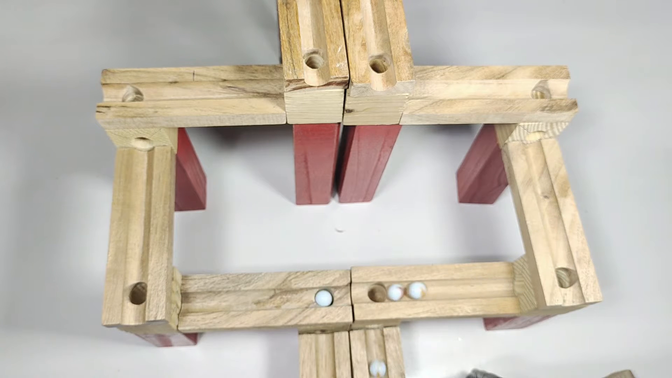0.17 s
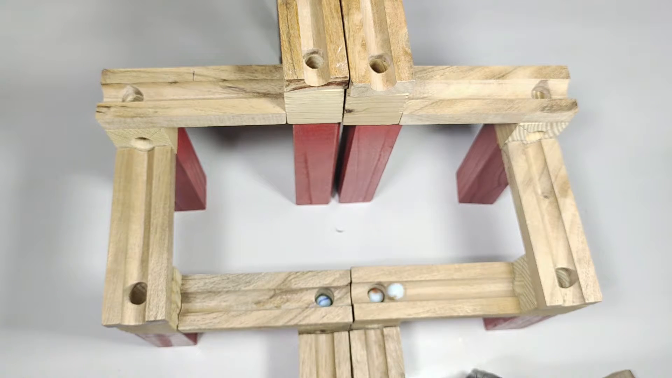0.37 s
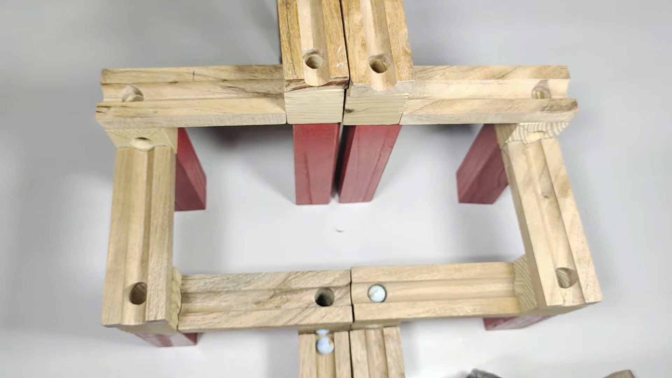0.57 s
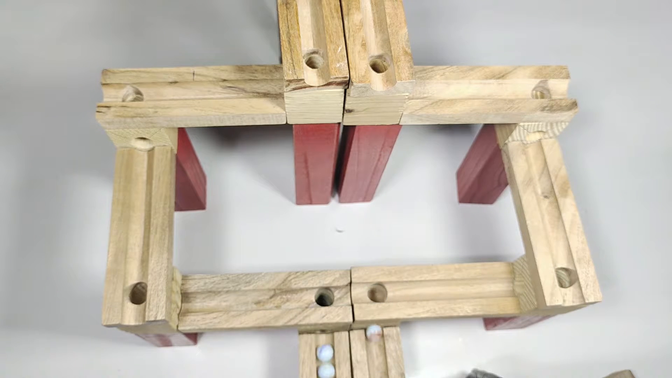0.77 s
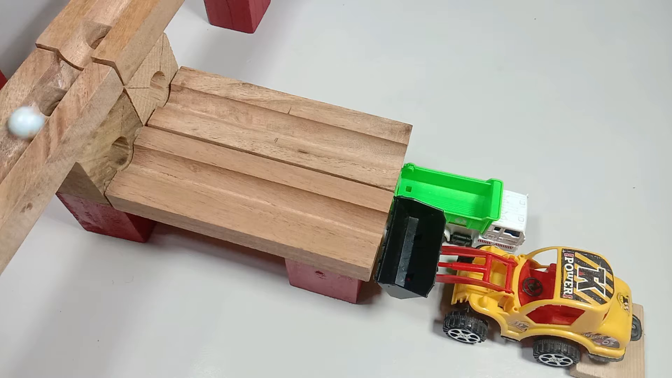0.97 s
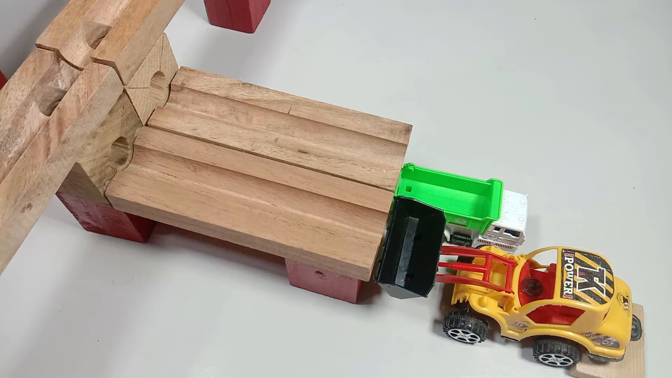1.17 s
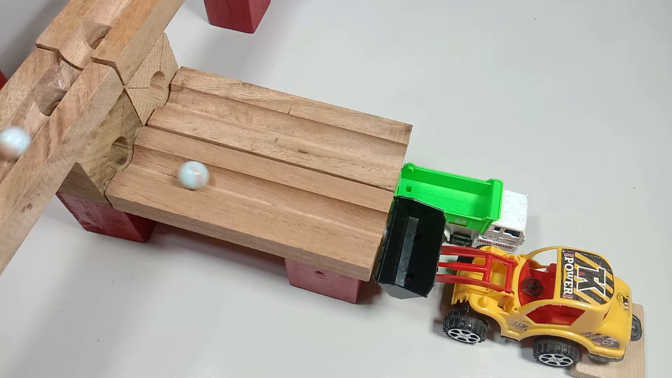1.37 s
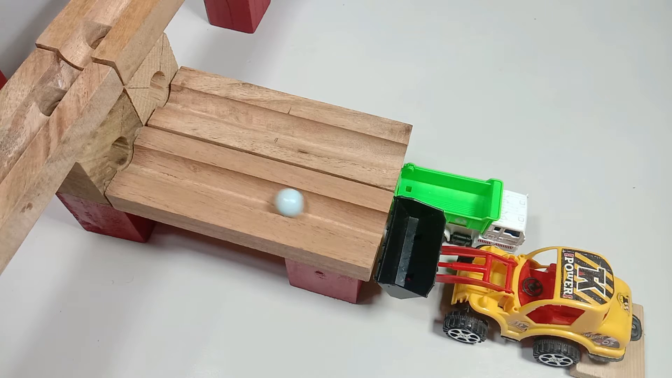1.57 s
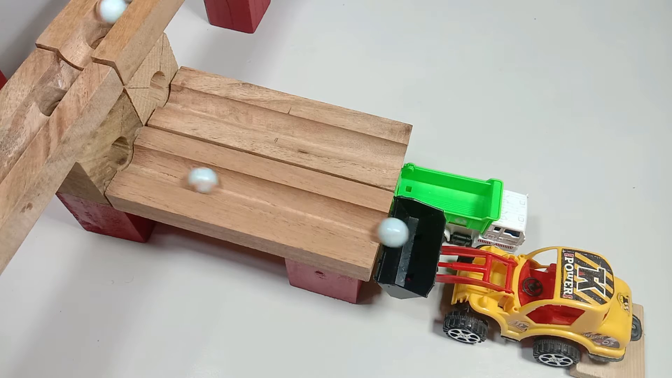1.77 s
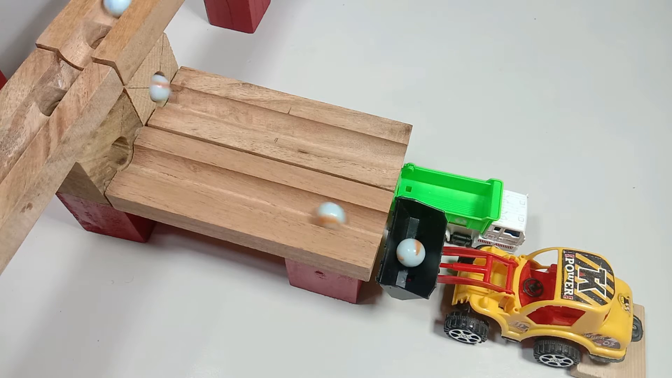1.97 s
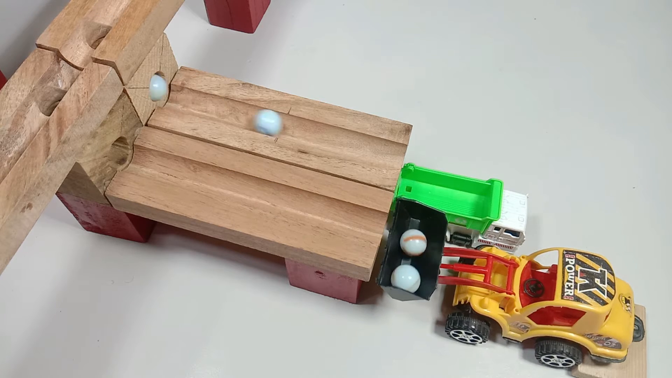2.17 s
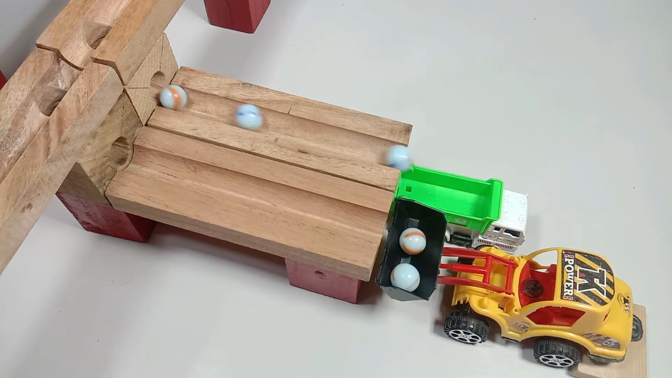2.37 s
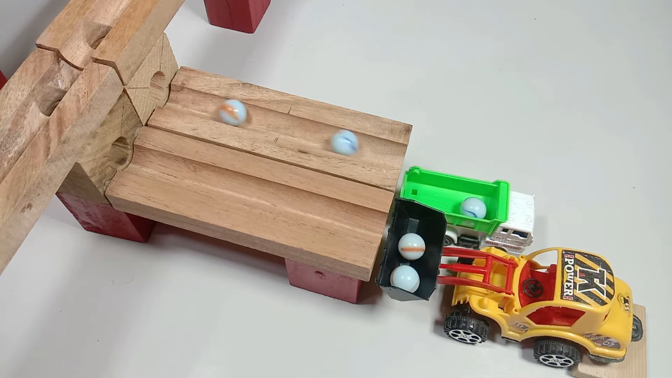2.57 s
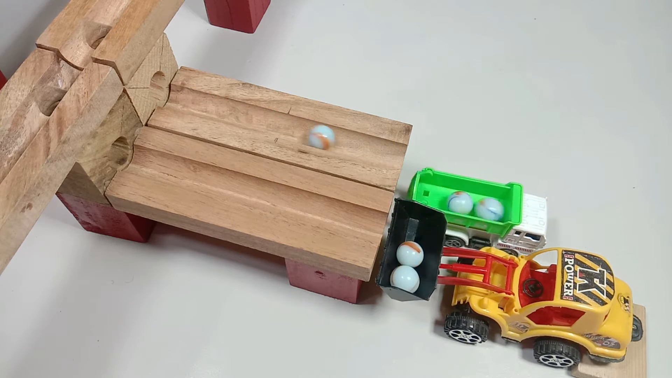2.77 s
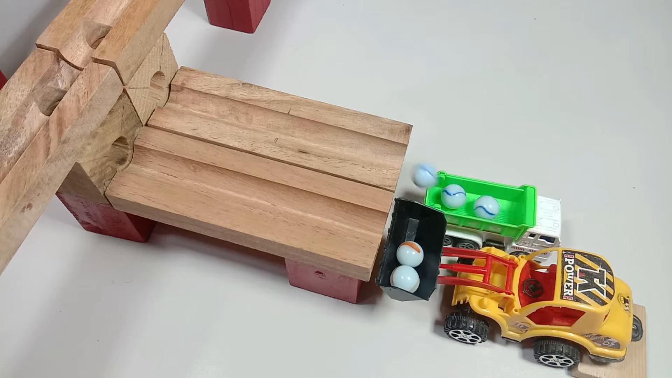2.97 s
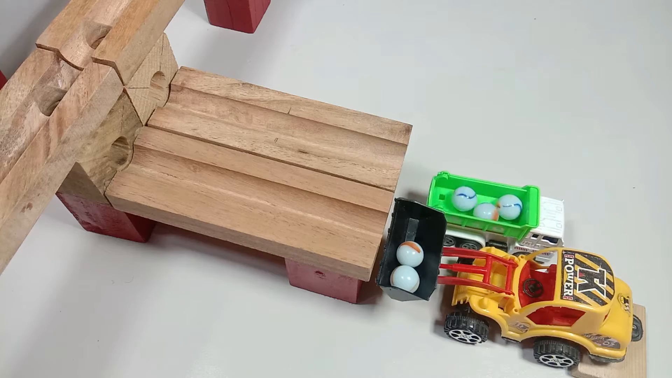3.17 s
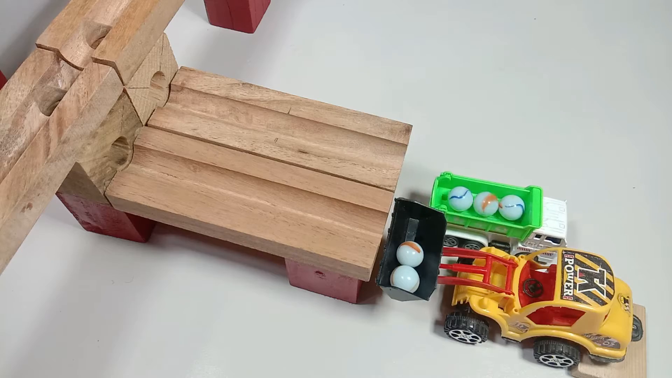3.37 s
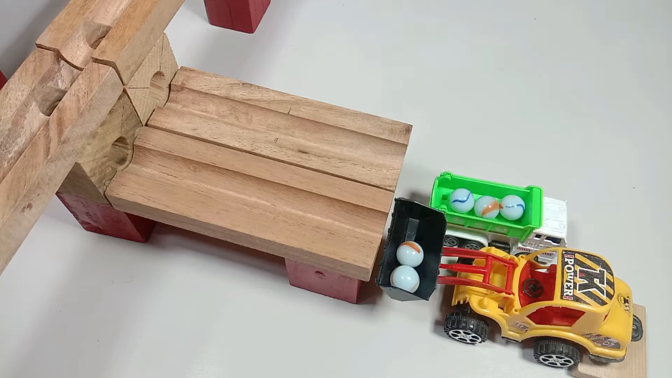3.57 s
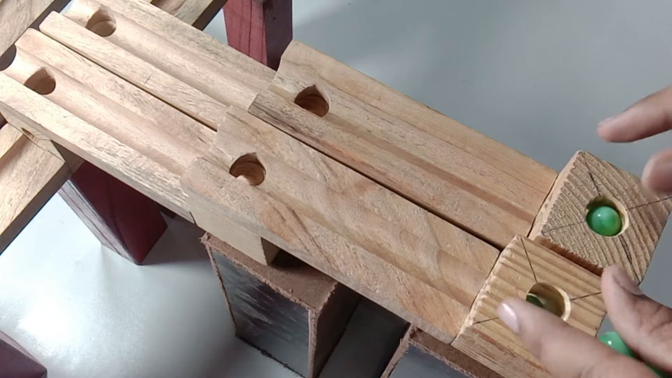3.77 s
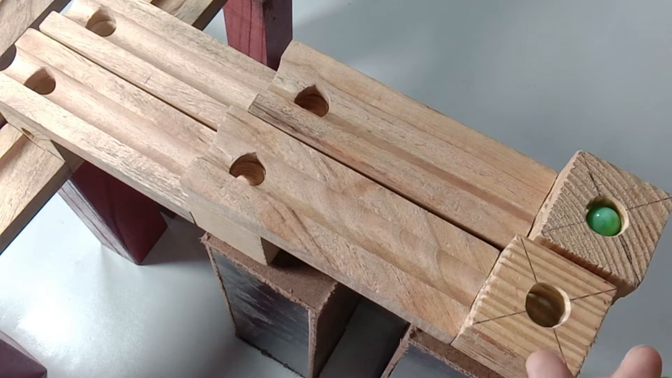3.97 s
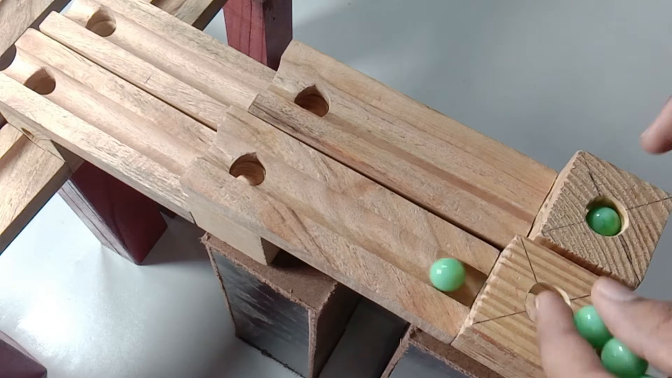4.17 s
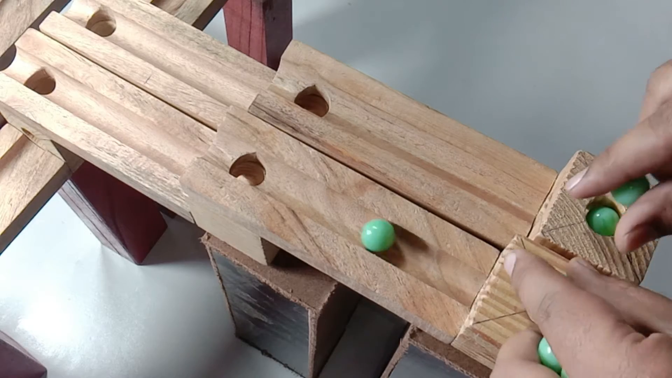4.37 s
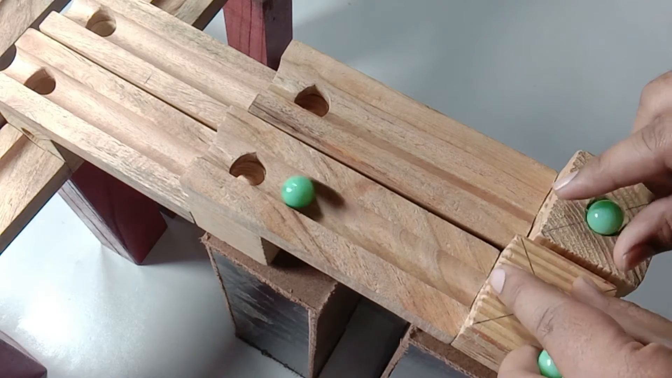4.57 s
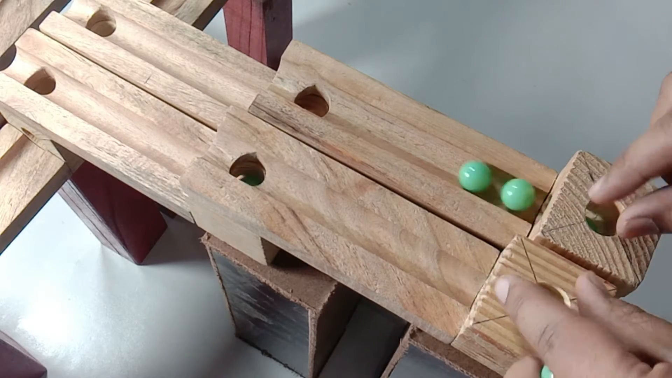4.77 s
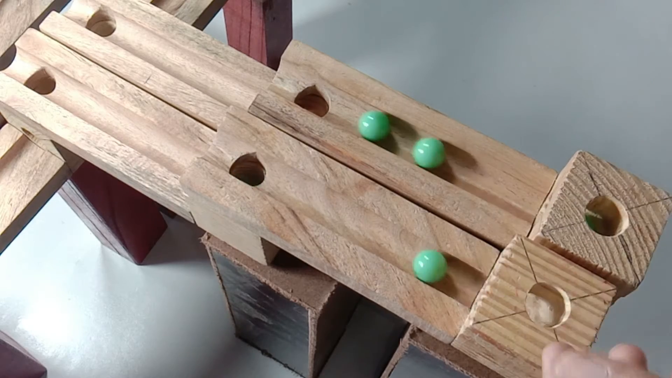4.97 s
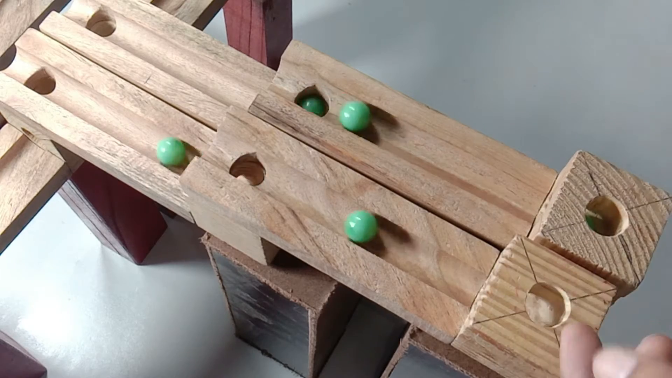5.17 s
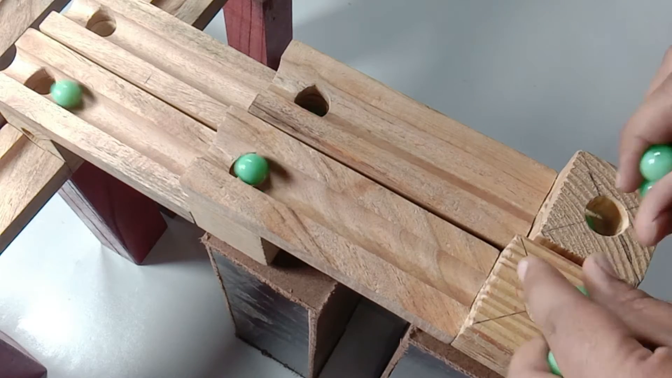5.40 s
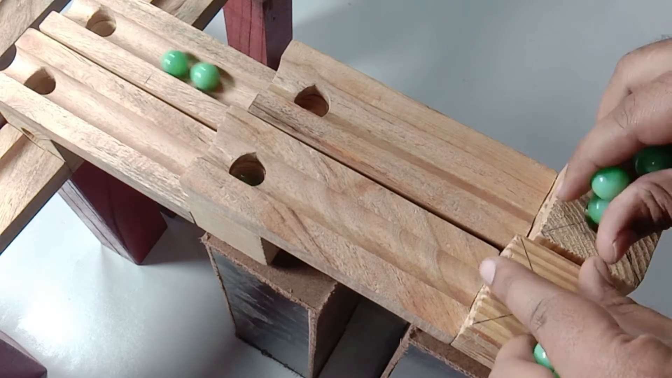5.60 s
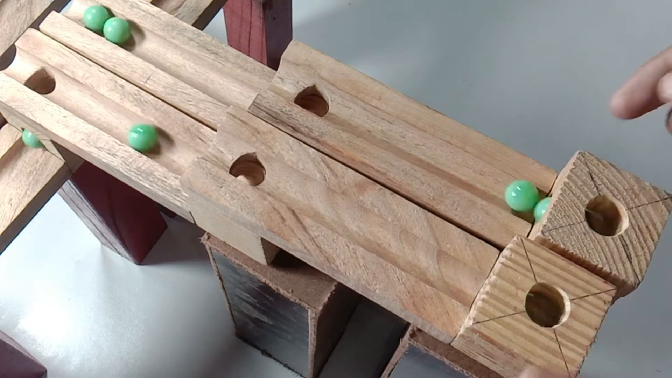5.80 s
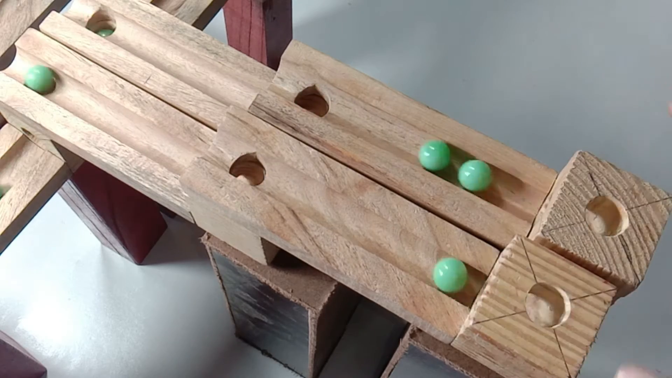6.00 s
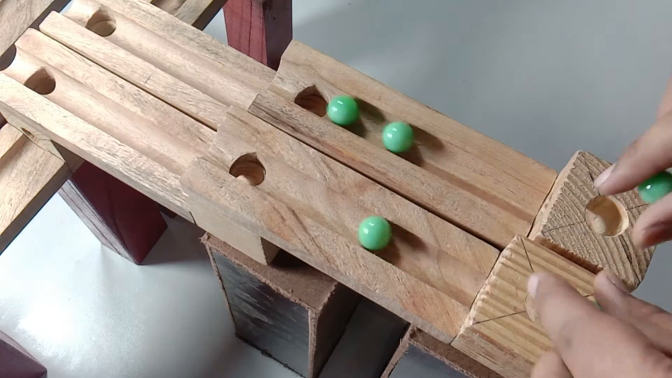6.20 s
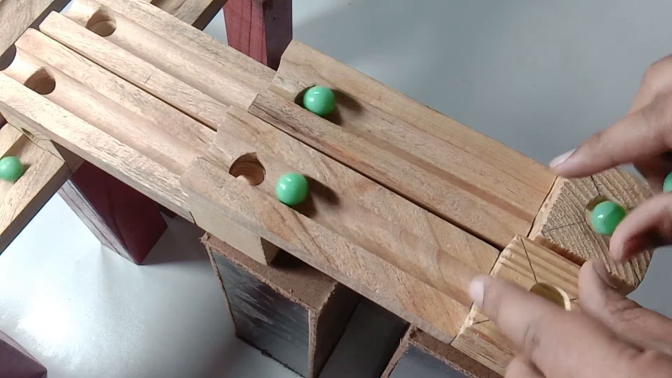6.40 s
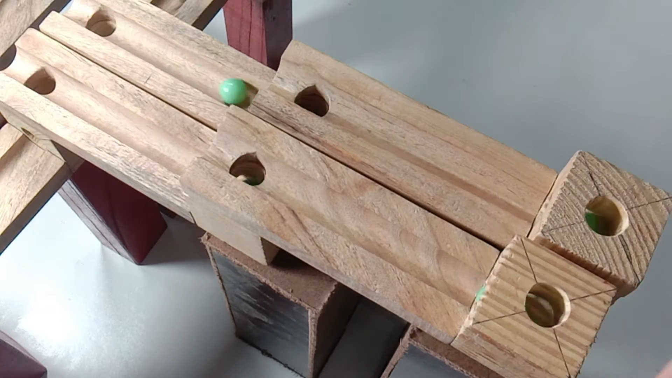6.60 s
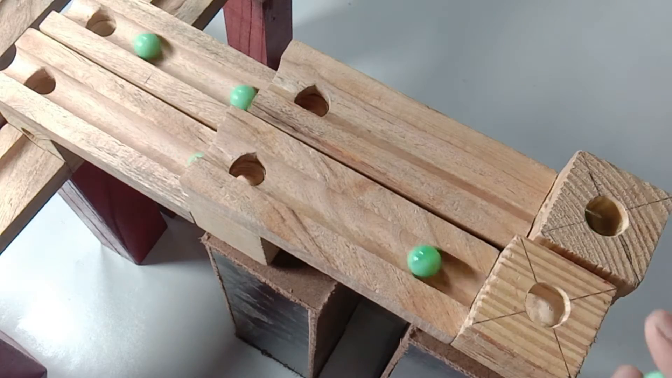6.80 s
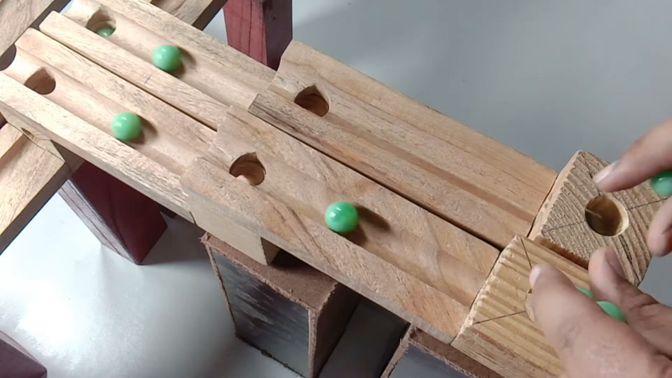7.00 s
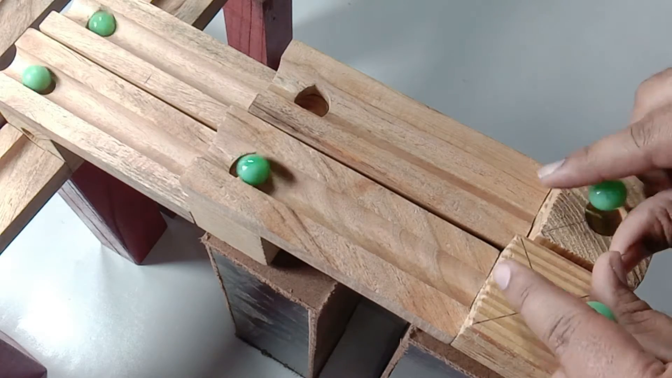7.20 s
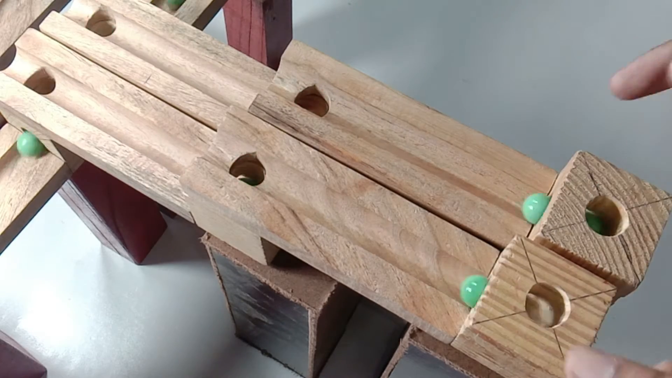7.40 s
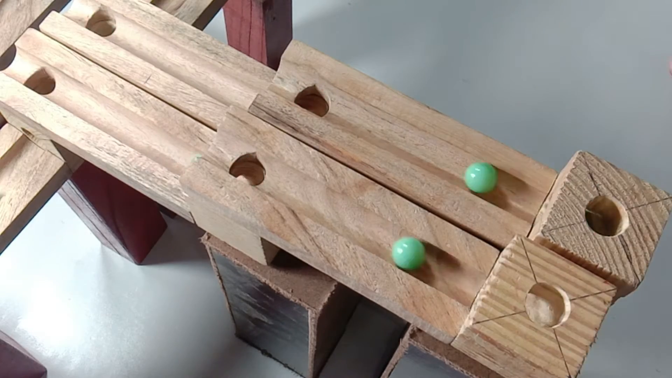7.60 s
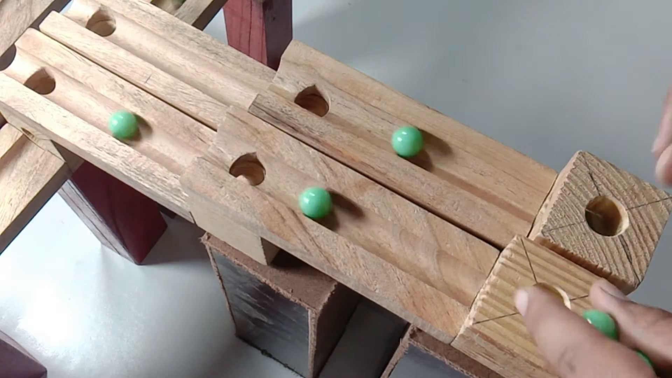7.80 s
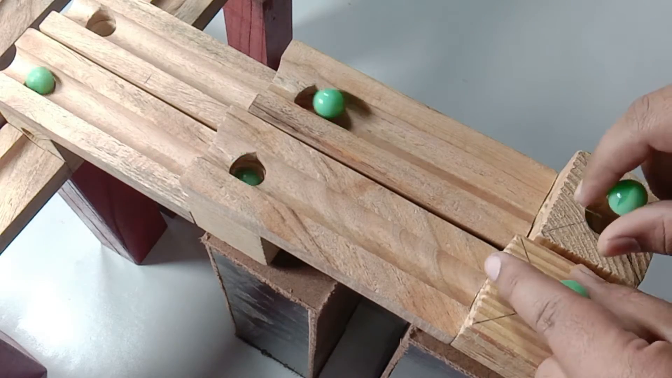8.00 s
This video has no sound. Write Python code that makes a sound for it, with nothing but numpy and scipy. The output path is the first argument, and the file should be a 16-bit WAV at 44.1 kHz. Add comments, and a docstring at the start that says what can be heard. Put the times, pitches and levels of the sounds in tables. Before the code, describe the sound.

In a small dry room, glass marbles roll and tap at a distance on a loose wooden frame, dull and soft. Closer knocks follow on a short wooden ramp, then loud bright clacks as marbles drop into plastic toy trucks. After a brief near-silence, a few marbles start down a wooden chute, soon building into a continuous clicking rattle.

```python
"""Glass marbles knock on grooved wooden blocks and plastic toy trucks, and roll along wooden tracks.
Three set-ups follow in a small dry room: a distant frame, a short ramp with trucks, a long chute.
Each knock rings the struck piece and opens with a noisy crack; rolling drives the track's own tones
with tiny bumps, over a low rumble. Marble-on-marble clicks are short bright bursts of noise.
One soft low shudder, a short echo and quiet room air complete the scene."""
import sys
import numpy as np
from scipy import signal
from scipy.fft import rfft, irfft, next_fast_len
from scipy.io import wavfile

SR = 44100
rng = np.random.default_rng(int(sys.argv[2]) if len(sys.argv) > 2 else 0)


def dump(signal):
    """Clip the signal to [-1, 1] and save it as 16-bit WAV at the path in sys.argv[1]."""
    limited = np.clip(np.atleast_2d(signal).T, -1, 1)
    pcm = np.round(limited * 32767).astype(np.int16)
    wavfile.write(sys.argv[1], SR, pcm)


N = 355005

# knocks of a marble on wood or plastic, before the filters: t/s, peak level/dB, ring of the struck spot f/Hz
KNOCKS = [(0.071, -22.5, 3500), (0.175, -24, 3800), (0.296, -12, 1840), (0.371, -28, 3670),
          (0.437, -26, 2240), (0.495, -20, 644), (0.615, -20.5, 930), (0.701, -22, 1400), (0.747, -20, 930),
          (0.83, -24, 3880), (0.842, -17.5, 4630), (0.864, -16.5, 1470), (0.896, -12, 1234),
          (0.985, -21, 3700), (1.042, -15, 3240), (1.076, -18.5, 1540), (1.121, -13.5, 5700),
          (1.137, -10, 4920), (1.195, -21, 1346), (1.26, -24.5, 1250), (1.337, -15.5, 4860),
          (1.351, -5.5, 3300), (1.382, -25, 4130), (1.408, -3.5, 4110), (1.478, -17.5, 1550),
          (1.531, -7.5, 4090), (1.602, -16, 3760), (1.618, -20, 3200), (1.678, -21, 1250),
          (1.702, -22, 1180), (1.775, -13.5, 3220), (1.849, -24, 1220), (1.927, -11.5, 3960),
          (1.935, -10, 3560), (2.001, -7.5, 2020), (2.057, -21, 1820), (2.105, -3.5, 2874),
          (2.239, -7, 3840), (2.26, -9.5, 1230), (2.319, -8, 2930), (2.341, -14, 2840), (2.414, -31, 4020),
          (2.468, -11.5, 2890), (2.573, -4, 2900), (2.603, -2, 3170), (2.638, -6.5, 3020),
          (2.741, -27, 3160), (2.835, -1, 3230), (2.869, -3, 3120), (3.085, -7.5, 2650),
          (3.096, -4.5, 2600), (3.131, -8, 3590), (3.199, -6.5, 3280), (3.235, -2, 3580),
          (3.507, -36, 3210), (3.752, -31.5, 1240), (3.782, -4.5, 1870), (3.801, -12.5, 2290),
          (4.226, -7.5, 3890), (4.265, -14, 3810), (4.555, -34, 1850), (4.618, -7.5, 1850),
          (4.699, -10, 2100), (4.776, -18, 2250), (4.805, -14, 2170), (4.86, -12, 2360),
          (4.897, -13.5, 2046), (4.993, -14.5, 3680), (5.064, -17.5, 6000), (5.29, -12.5, 1476),
          (5.355, -15, 3700), (5.448, -15.5, 1990), (5.504, -14, 4330), (5.554, -15.5, 2180),
          (5.568, -9, 3570), (5.607, -15, 2000), (5.681, -5.5, 1930), (5.742, -7, 2304),
          (5.849, -10.5, 2580), (5.953, -13, 2140), (5.982, -21, 360), (6.056, -8, 3820),
          (6.104, -11.5, 2490), (6.17, -13.5, 4240), (6.23, -13.5, 1810), (6.372, -16.5, 2290),
          (6.408, -19, 3800), (6.456, -5.5, 2240), (6.489, -14, 2380), (6.5, -3.5, 2150),
          (6.582, -15, 2230), (6.607, -17, 1880), (6.616, -5, 3570), (6.71, -16.5, 1670),
          (6.802, -12, 3420), (6.835, -9.5, 3430), (6.878, -16, 3640), (7.014, -11, 3500),
          (7.078, -12, 3450), (7.131, -17, 1760), (7.271, -13, 3540), (7.307, -10, 3300),
          (7.318, -5.5, 2250), (7.353, -9.5, 2380), (7.396, -19, 2280), (7.417, -6.5, 2220),
          (7.507, -17.5, 3940), (7.557, -9, 3540), (7.6, -18.5, 3570), (7.693, -12, 5510),
          (7.898, -16, 2820), (8.031, -14, 2180)]
# natural tones (modes) of each object: f/Hz, relative level/dB
FRAME = [(560, 1), (1190, -3), (2110, -4.5), (3880, -9)]
RAMP = [(900, -15.5), (1280, -4.5), (2070, -16.5), (4130, -17.5)]
TRUCK = [(2590, -5), (3200, 2), (5900, -3.5), (7020, 6)]
CHUTE = [(830, -5), (1290, -11), (1865, 1), (2290, -5), (3550, -1), (5410, -7)]
# objects in play from each moment on: start t/s, modes that are struck, modes of the track,
# share of many marbles at once/0-1
STAGES = [(0, FRAME, FRAME, .7), (.97, RAMP, RAMP, .55), (2.55, TRUCK, RAMP, .4), (3.6, CHUTE, CHUTE, .1),
          (4.6, CHUTE, CHUTE, .9)]
# rolling: t/s, hum of the groove before it swells level/dB, low rumble of the whole track level/dB
ROLL = [(0, -37.5, -49.5), (.4, -53.5, -55), (1.15, -44.5, -45), (1.312, -62.5, -50.5), (1.41, -51.5, -45),
        (2.51, -48.5, -56.5), (3.02, -54.5, -63.5), (3.12, -87.5, -82), (4.15, -66, -68.5),
        (4.26, -52.5, -77.5), (4.551, -57.5, -61), (4.75, -47.5, -55.5), (5.9, -46, -48.5),
        (7.12, -47, -47.5), (7.24, -55, -51), (7.35, -45.5, -48.5), (8.05, -45, -48.5)]
# colour of a blow's crack, from many dense small modes: f/Hz, relative level/dB per Hz
CRACK = [(200, -20.5), (1900, -1), (6800, 2), (8200, -8.5)]
# colour of the quiet room air: f/Hz, relative level/dB per Hz
AIR = [(25, -42.5), (60, -5.5), (120, -4), (300, -34.5), (5500, -28.5), (9000, -43.5)]
# clicks of marble on marble, before the last band-pass: t/s, peak above 7.5 kHz level/dB
CLICKS = [(1.046, -25.5), (1.1553, -21.5), (1.925, -18.5), (2.196, -18), (2.2764, -24), (2.575, -11),
          (2.8384, -13.5), (3.0834, -14), (3.1989, -20), (3.2233, -14.5), (3.8005, -20.5), (3.8536, -22.5),
          (3.88, -27), (3.9931, -22.5), (4.017, -30), (4.1032, -28.5), (4.1662, -26), (4.1931, -23.5),
          (4.595, -16), (4.7168, -19.5), (5.0036, -27), (5.084, -22.5), (5.169, -29.5), (5.2098, -20.5),
          (5.2753, -24.5), (5.382, -35), (5.4202, -27), (5.7397, -19), (5.8373, -25.5), (5.8598, -21.5),
          (6.081, -22.5), (6.7099, -21.5), (6.924, -20), (7.42, -22.5), (7.544, -23), (7.671, -21),
          (7.8117, -23.5)]
# colour of a glass click: f/Hz, relative level/dB per Hz
GLASS = [(1500, -8.5), (3500, 0.5), (7000, 0), (8200, -19.5), (10000, -7.5), (13500, -24.5), (14800, -11.5),
         (16300, -40)]
# one brief low shudder: t/s, level/dB, length/s
BUMP = (0.75, -44.5, 0.15)

AIR_DB = -70  # average (RMS) level of the room air
EDGE_HZ = 16700  # upper edge of the whole sound
TAP_CRACK = .08  # a light tap rings more than it cracks
STIR_DB, STIR_S = 25.5, 0.063  # swell of the rolling after a knock: strength, and time to calm down
TAPS_PER_S = 110  # light taps of skipping marbles, when the share of many marbles is 1
TAP_DB = 12.5  # peak of the strongest taps, over the level of the groove hum


def amp(db):
    """Turns decibels into a plain factor."""
    return 10 ** (np.asarray(db) / 20)


def evened(x):
    """Scales x to an average (RMS) level of 1."""
    return x / np.sqrt(np.mean(x ** 2) + 1e-20)


def colour(x, points):
    """Shapes x by a spectrum given in dB on a log-frequency axis."""
    hz, db = np.transpose(points)
    size = next_fast_len(len(x))
    f = np.fft.rfftfreq(size, 1 / SR)
    gain = amp(np.interp(np.log(f + 1), np.log(hz), db))
    return irfft(rfft(x, size) * gain, size)[:len(x)]


def band(x, lo_hz, hi_hz):
    """Keeps mainly what lies between two frequencies."""
    return signal.sosfilt(signal.butter(3, [lo_hz, hi_hz], "bandpass", fs=SR, output="sos"), x)


def add(mix, s, sound):
    """Adds a sound to the mix at time s, cut off at the end of the mix."""
    part = mix[round(s * SR):][:len(sound)]
    part += sound[:len(part)]


def resonate(x, hz, width):
    """One mode as a two-pole filter: it lets through most at its centre, and rings longer if narrow."""
    r = np.exp(-np.pi * width / SR)
    return signal.lfilter([1 - r, 0, r - 1], [1, -2 * r * np.cos(2 * np.pi * hz / SR), r * r], x)


def width_of(hz):
    """Base width of a mode in Hz: losses in the material widen the higher modes."""
    return 50 + .015 * hz


def wander(depth_db, per_s):
    """A gain that drifts at random, by depth_db on average (RMS)."""
    steps = rng.standard_normal(int(N / SR * 40))  # 40 steps per second
    steps = signal.lfilter([1], [1, -np.exp(-per_s / 40)], steps)
    drift = np.interp(np.linspace(0, len(steps), N), np.arange(len(steps)), evened(steps))
    return amp(depth_db * drift)


def stir():
    """Gain of the rolling: marbles chatter on after a blow, then calm down."""
    s, db, _ = np.transpose(KNOCKS)
    blows = np.zeros(N)
    blows[(s * SR).astype(int)] = amp(db + STIR_DB)
    return np.sqrt(1 + signal.lfilter([1], [1, -np.exp(-1 / (STIR_S * SR))], blows))


def track_rings(drive, part, modes, many):
    """Rolling excites the track's modes; its contact is too soft to reach the upper ones."""
    rings = 0
    for hz, db in modes:
        soft_db = -40.0 * max(np.log2(hz / 1900), 0)
        ring = resonate(drive[part], hz, (1 + many) * width_of(hz))
        ring = evened(resonate(ring, hz, 3 * width_of(hz)))
        rings = rings + amp(db + soft_db) * wander(3 + 5 * many, 12)[part] * ring
    return evened(rings)


def add_taps(hum, start, end, modes, many):
    """Skipping marbles tap lightly at random moments, near the upper modes of the track."""
    kinds = [knock(start, hz, rng.standard_normal((2, 2000)), TAP_CRACK)
             for hz, _ in 2 * modes[2:]]  # two variants per mode
    count = round(TAPS_PER_S * many * (end - start))
    for when, kind, size in rng.random((count, 3)):
        tap = kinds[int(kind * len(kinds))]
        add(hum, start + when * (end - start), amp(TAP_DB - 13.4 * size) * tap)


def rolling():
    """Tiny irregular bumps of the wood grain drive the modes of the track and a low rumble."""
    t = np.arange(N) / SR
    s, hum_db, rumble_db = np.transpose(ROLL)
    sizes = amp(4.5 * np.minimum(rng.exponential(1, N), 4))
    present = rng.random(N) < 600 / SR  # about 600 bumps per second
    bumps = sizes * present * rng.choice([-1, 1], N)
    drive = evened(bumps) + .5 * rng.standard_normal(N)
    roar = evened(band(drive, 622, 2160)) + 0.12 * evened(band(drive, 2300, 6000))
    roar = wander(3.8, 25) * roar
    hum = np.zeros(N)
    ends = [row[0] for row in STAGES[1:]] + [N / SR]
    for (start, _, modes, many), end in zip(STAGES, ends):
        part = slice(round(start * SR), round(end * SR))
        rings = track_rings(drive, part, modes, many)
        # one marble sings in its block; many marbles on many blocks blur into a broad roar
        hum[part] = (1 - .75 * many) * rings + .6 * many * roar[part]
        add_taps(hum, start, end, modes, many)
    # the reversed drive keeps the rumble from moving in step with the hum
    rumble = evened(band(drive[::-1], 110, 480) * wander(3, 25))
    hum_gain = amp(np.interp(t, s, hum_db)) * stir()
    return hum_gain * hum + amp(np.interp(t, s, rumble_db)) * rumble


def room_air():
    """Steady, quiet noise of the room."""
    return amp(AIR_DB) * evened(colour(rng.standard_normal(N), AIR))


def struck(s):
    """Modes of the object that is struck at time s."""
    return [modes for start, modes, *_ in STAGES if start <= s][-1]


def knock(s, spot_hz, luck, crack_share=.21):
    """Modes near the struck spot ring most; a short noisy crack opens the blow."""
    t = np.arange(luck.shape[1]) / SR
    modes = struck(s)
    hz, db = np.transpose(modes + [(spot_hz, 5.0)])[:, :, None]  # the spot is the last mode
    near_db = -4.0 * abs(np.log2(hz / spot_hz)) + 6.0 * luck[1, :len(hz), None]
    hz[:-1] += 28 * luck[1, -len(hz) + 1:, None]  # every blow shifts the tones slightly at random, in Hz
    width = width_of(hz) * (2 if modes == FRAME else 1)  # the loose frame damps its blocks
    width[-1] *= 2  # the spot itself dies sooner than the modes of the whole piece
    tones = np.exp(-np.pi * width * t) * np.sin(2 * np.pi * hz * t)
    ring = (amp(db + near_db) * tones).sum(0)
    noise = colour(luck[0], CRACK)
    noise = evened(noise) + evened(resonate(noise, spot_hz, spot_hz))
    crack = evened(noise) * (np.exp(-t / 0.0036) + 0.044 * np.exp(-t / 0.11))
    body = ring / abs(ring).max() + crack_share * crack
    body *= (1 - np.exp(-t / 0.00047)) ** 2  # soft start
    return body / abs(body).max()


def knocks():
    """Each knock is followed by four smaller rebounds on a spot nearby as the marble settles."""
    out = np.zeros(N)
    luck = rng.standard_normal((len(KNOCKS), 2, 2, 2000))
    later = rng.random((len(KNOCKS), 3, 4))
    for (s, db, hz), (first, second), (wait, size, shift) in zip(KNOCKS, luck, later):
        add(out, s, amp(db) * knock(s, hz, first))
        nearby_hz = hz * 2 ** (0.21 * (shift[0] - .5))
        rebound = amp(db - 8.5) * knock(s, nearby_hz, second)
        for k, after in enumerate(np.cumsum(0.0017 + 0.015 * wait)):
            add(out, s + after, size[k] * amp(-3.5 * k) * rebound)
    return out


def bump():
    """A soft low shudder: a short swell of deep noise."""
    s, db, length = BUMP
    t, out = np.arange(0, length, 1 / SR), np.zeros(N)
    swell = np.sin(np.pi * np.sqrt(t / length))  # rises faster than it falls
    add(out, s, amp(db) * swell * evened(band(rng.standard_normal(len(t)), 40, 112)))
    return out


def clicks():
    """Glass on glass gives very short bright bursts; each chatters three times more."""
    out, t = np.zeros(N), np.arange(2000) / SR
    luck = rng.standard_normal((len(CLICKS), 2000))
    later = rng.random((len(CLICKS), 2, 3))
    fade = np.exp(-t / .0008) + .3 * np.exp(-t / .008)  # sharp snap and a weaker tail
    for (s, db), noise, (wait, size) in zip(CLICKS, luck, later):
        click = evened(colour(noise, GLASS)) * fade
        click /= abs(band(click, 7500, 16500)).max()
        delays = [0, *np.cumsum(0.003 + 0.018 * wait)]
        for after, share in zip(delays, [1, *(0.53 * size)]):
            add(out, s + after, share * amp(db) * click)
    return band(out, 810, 16000)


def room(x, t60=.16):
    """Sparse reflections of random sign that fall by 60 dB in t60 seconds."""
    taps = np.zeros(SR // 3)
    at = np.arange(130, len(taps) - 20, 20)  # the first comes after about 3 ms
    taps[at + rng.integers(0, 20, len(at))] = rng.choice([-1., 1.], len(at))
    taps *= amp(-60 * np.arange(len(taps)) / SR / t60)
    return signal.fftconvolve(x, taps / np.linalg.norm(taps))[:N]


def scene():
    """Mixes the marbles with their echo, the shudder and the room air."""
    # knocks and rolling are heard without deep bass or high treble
    near = band(knocks() + rolling(), 140, 5940) + clicks()
    far = np.arange(N) < STAGES[1][0] * SR  # the distant frame is heard duller
    near = np.where(far, band(near, 60, 6500), near)
    return (near + amp(-10.0) * room(near) + bump() + room_air())[None]


def record(dry):
    """A steep low-pass removes what lies above the upper edge."""
    low_pass = signal.firwin(511, EDGE_HZ, window=("kaiser", 9), fs=SR)
    return signal.oaconvolve(dry, low_pass[None], "same")


dry = scene()
out = record(dry)
dump(out)
```